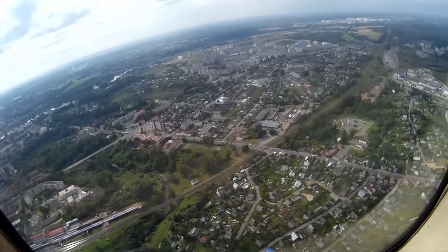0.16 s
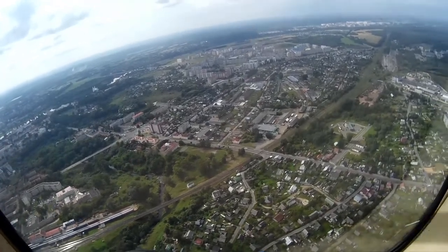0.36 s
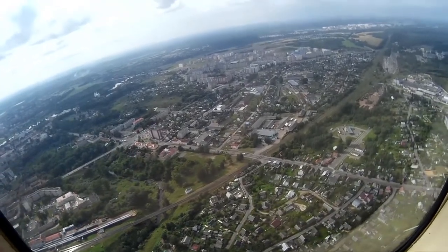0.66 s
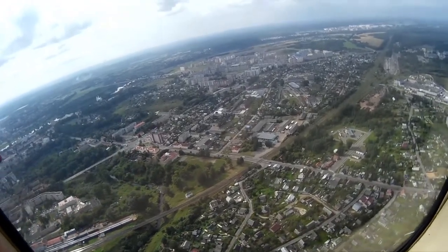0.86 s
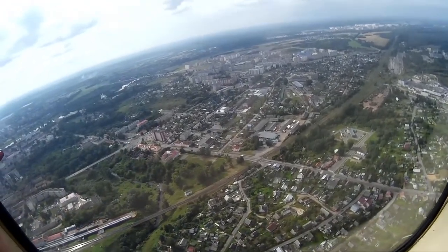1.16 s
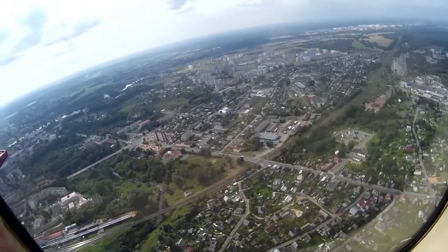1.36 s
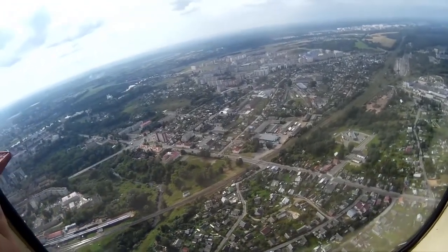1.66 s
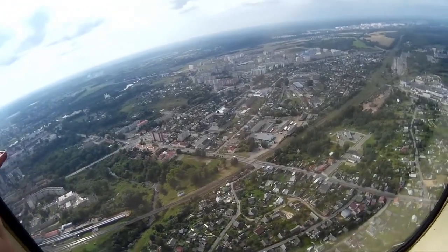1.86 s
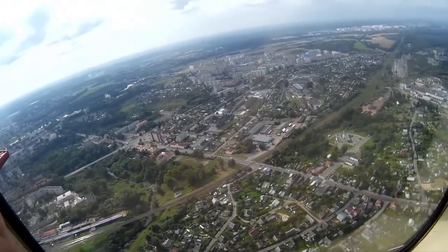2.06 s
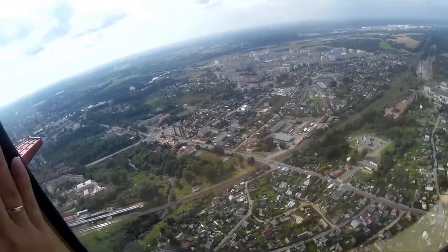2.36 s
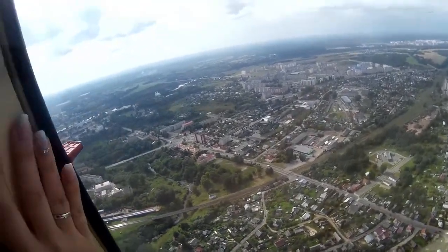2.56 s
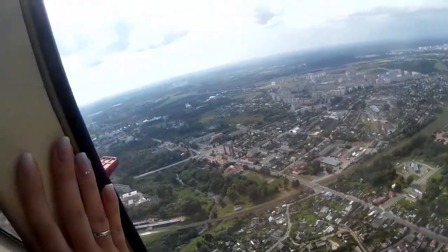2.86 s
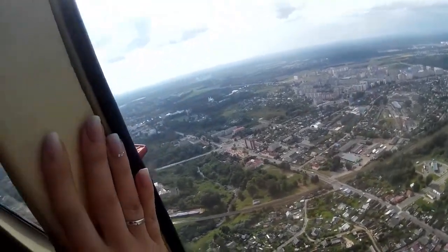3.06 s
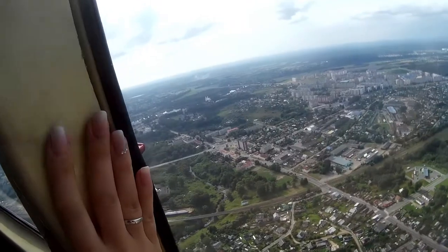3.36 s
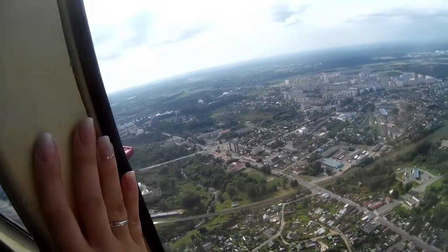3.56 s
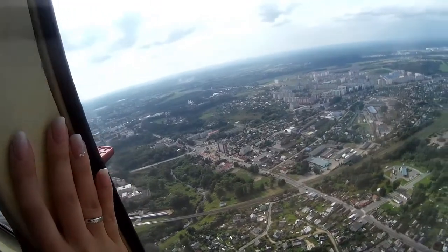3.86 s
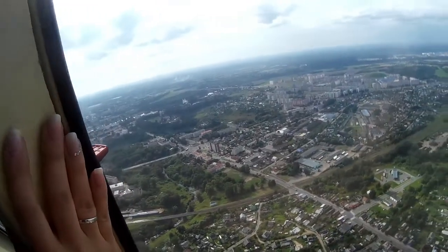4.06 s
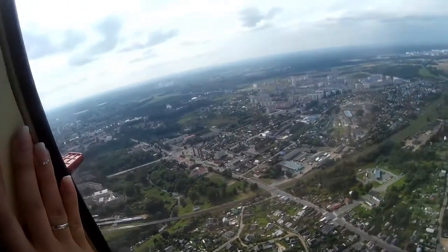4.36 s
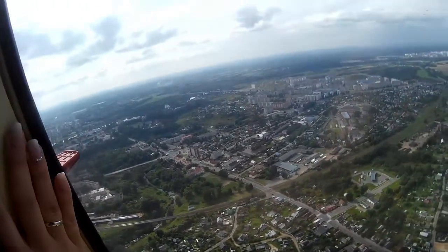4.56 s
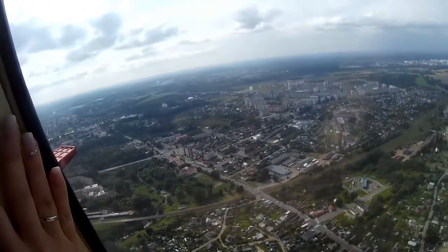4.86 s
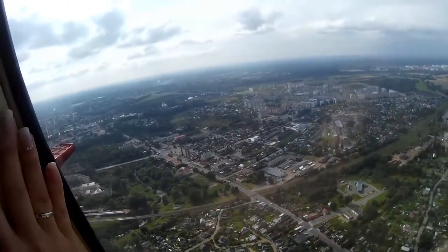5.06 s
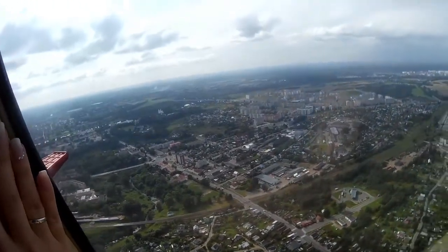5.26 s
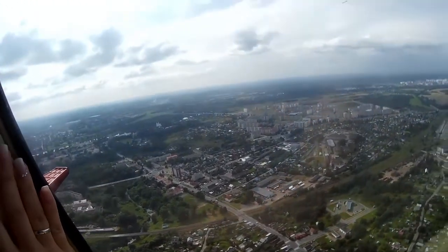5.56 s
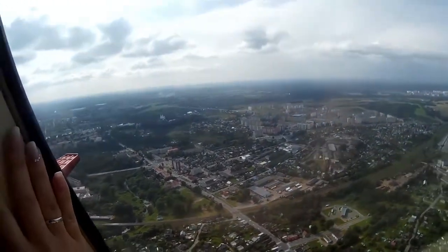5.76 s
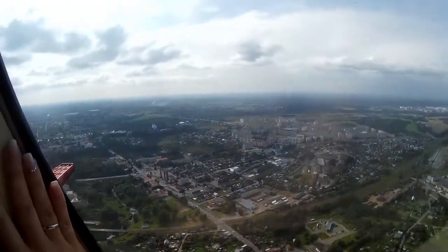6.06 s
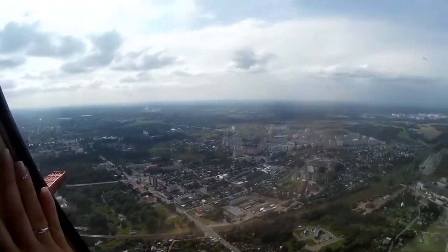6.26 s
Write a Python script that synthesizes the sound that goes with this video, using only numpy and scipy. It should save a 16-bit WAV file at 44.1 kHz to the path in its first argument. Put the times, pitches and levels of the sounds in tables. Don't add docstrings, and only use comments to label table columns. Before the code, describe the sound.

Inside a flying helicopter cabin, a loud steady engine drone and deep airflow roar carry a piercing, throbbing gear whine around two kilohertz.

```python
import sys
import numpy as np
from scipy import signal
from scipy.fft import rfft, irfft
from scipy.io import wavfile
from scipy.ndimage import uniform_filter1d

SR = 44100
rng = np.random.default_rng(int(sys.argv[2]) if len(sys.argv) > 2 else 0)


def inscribe(sig):
    pcm = np.round(np.clip(np.atleast_2d(sig).T, -1, 1) * 32767)
    wavfile.write(sys.argv[1], SR, pcm.astype(np.int16))


def attenuation_scalar(level_db):
    decades = np.asarray(level_db, float) / 20
    return 10 ** decades


N = 282240
CONTROL_STEP = 16
SLOW = np.arange(0, N, CONTROL_STEP) / SR

# time in seconds, speed in Hz.
SHAFT_SPEED = [(0, 98.70), (.3, 98.73), (1.05, 99.06), (1.5, 99.03), (1.85, 98.91), (2.2, 98.99),
               (2.8, 98.80), (3.2, 99.0), (3.65, 98.64), (4.0, 98.61), (4.2, 98.71), (4.45, 98.65),
               (5.3, 99.37), (5.5, 99.34), (5.95, 99.12), (6.4, 99.23)]
# time in seconds, level in dB.
WHINE_LEVEL = [(0, -16), (.36, -16), (.95, -19), (1.32, -14), (1.5, -17.5), (2.2, -18.5), (2.32, -15),
               (2.73, -10.5), (3.07, -14), (3.11, -23.5), (3.33, -23.5), (3.46, -17), (3.86, -16.5),
               (4.05, -18), (5.24, -16), (5.62, -18), (5.73, -15.2), (6.4, -19.5)]
# time in seconds, pitch in Hz, level in dB.
TURBINE_SPOOL = [(0, 685.5, -29), (1.3, 685.5, -31), (2.6, 684.5, -35), (3.6, 686, -33), (4.8, 689, -30),
                 (5.5, 688, -32), (6.4, 685, -32)]
FAN_HARMONICS_DB = [-15.3, -28, 0, -33.5, -39.5, -43, -36, -49, -45, -47]
WHINE_OVERTONES_DB = [-38.8, -53, -60, -59, -67]
SMALL_PART_ORDERS = [29.5, .49, .98, 2, 4.0645, 4.9647, 5.848, 7.104, 8.3587, 9.598, 9.9814, 10.8492, 11,
                     11.1426, 11.2824, 12.688, 13.895, 15, 15.6225, 16.49, 16.82, 16.99, 18.935, 19, 19.91,
                     20.08, 21, 22, 24, 25]
SMALL_PART_LEVELS_DB = [-48, -40, -35, -35, -34.5, -41, -38, -42, -36, -45, -40.5, -39.5, -45, -48, -38.5,
                        -44, -47, -47, -47, -41, -47, -47, -49, -47, -46, -46.5, -42, -39, -36.5, -38]
# frequency in Hz, density in dB per Hz.
ROAR_SPECTRUM = [(32, -6), (55, -11), (120, -5), (170, 0), (200, -3), (217, -10), (250, -3), (350, -13),
                 (600, -12), (1200, -19), (2600, -25), (4000, -35), (7000, -46), (15000, -56)]
# time in seconds, buffeting in dB about its mean.
WINDOW_BUFFET = [
    (0, -1),
    (1, -1),
    (2.3, 1.5),
    (4.5, 2),
    (6.4, 6),
]
GEARBOX_SHAKERS = [(.1103, .14, .2, .362), (.1253, .18, .02, -.066), (.1356, -.067, .32, .06),
                   (.132, .056, .17, -.028), (.1226, .022, .108, .042), (.1174, .016, .092, .49),
                   (.5196, 0, .127, -.05), (.5163, .03, .09, .18)]
# time in seconds, dB gained by the main mesh's second tone.
WALL_GAIN = [(0, 2.5), (.45, 1), (1.2, -4), (2.1, -0.5), (2.5, 0), (3.7, -1), (4.5, 6.5), (5.3, 8),
             (6.0, 0)]
MESH_TONES_DB = [-20.5, -29.5, -34.5]

BLADE, FAN, MAIN_MESH, PINION = .12518, 1.5446, 6.5096, 23
FAN_THIRD_DB = -21.5
WALL_SHARE_FAN, WALL_SHARE_MESH = 0.1, 0.17
MESH_THIRD_DB_PER_HZ = 16
OVERTONE_WANDER_DB = 1.6
SHAKE_AT_DB, SHAKE_STEADY = -17.5, .9
ROAR_DB, RUSH_DB = -16.5, -2.3
COMPRESSOR_HZ, COMPRESSOR_WIDTH_HZ, COMPRESSOR_DB = 11450, 620, -48.5
TOP_HZ = 15740


def held(control):
    return np.repeat(control, CONTROL_STEP)[:N]


def curve(table):
    s, *columns = np.transpose(table)
    return [np.interp(SLOW, s, column) for column in columns]


def walk(rate):
    steps = int(N * rate / SR) + 2
    stairs = np.repeat(rng.standard_normal(steps), 16)
    smooth = uniform_filter1d(uniform_filter1d(stairs, size=16), size=16)
    return 1.3 * np.interp(SLOW * rate * 16, np.arange(len(smooth)), smooth)


def tone(turns, db, waver_db=1.5, slip=.03, rate=3):
    gain = np.sqrt(2) * attenuation_scalar(db + waver_db * walk(rate))
    phase = rng.random() + slip * walk(rate)
    return held(gain) * np.sin(2 * np.pi * (turns + held(phase)))


def compressor():
    hz = np.arange(N // 2 + 1) * SR / N
    whistle = np.exp(-.5 * ((hz - COMPRESSOR_HZ) / COMPRESSOR_WIDTH_HZ) ** 2)
    rising = .45 * (hz / 15000) ** 3
    hiss = irfft(rfft(rng.standard_normal(N)) * (whistle + rising), N)
    return hiss / hiss.std() * held(attenuation_scalar(COMPRESSOR_DB + 1.2 * walk(4.2)))


def roar(turns):
    hz = np.maximum(np.arange(N // 2 + 1) * SR / N, 1)
    knots_hz, knots_db = np.transpose(ROAR_SPECTRUM)
    colour = attenuation_scalar(np.interp(np.log(hz), np.log(knots_hz), knots_db)) * (hz > 21)
    noise = rfft(rng.standard_normal(N)) * colour
    buffet_db = curve(WINDOW_BUFFET)[0]
    place = 2 * np.log2(hz / 16)
    swell = walk(.8)
    out = np.zeros(N)
    for step in range(21):
        band = irfft(noise * np.maximum(1 - abs(place - step), 0), N)
        flow_db = (step < 5) * buffet_db + (step > 14) * RUSH_DB - (step > 17) * 1.5
        out += held(attenuation_scalar(0.18 * swell + 0.67 * walk(4.79) + flow_db)) * band
    out *= 1 + 0.0057 * np.cos(2 * np.pi * BLADE * turns)
    return out * attenuation_scalar(ROAR_DB) / out.std()


def small_parts(turns):
    out = np.zeros(N)
    for order, line_db in zip(SMALL_PART_ORDERS, SMALL_PART_LEVELS_DB):
        out += tone(order * turns, line_db)
    spool_hz, spool_db = curve(TURBINE_SPOOL)
    return out + tone(np.cumsum(held(spool_hz)) / SR, spool_db)


def rotor_and_fan(turns):
    fan_third_db = FAN_THIRD_DB + WALL_SHARE_FAN * curve(WALL_GAIN)[0]
    out = np.sqrt(2) * attenuation_scalar(-20.0) * np.cos(2 * np.pi * (BLADE * turns - .47))
    out += tone(turns, -14.5, waver_db=.5, slip=.015)
    for k, db in enumerate(FAN_HARMONICS_DB, start=1):
        out += tone(k * FAN * turns, db + (k == 3) * fan_third_db, waver_db=.6, slip=0.011)
    return out


def main_mesh(turns):
    load = 1 + .2 * np.cos(2 * np.pi * BLADE * turns)
    wall_db, speed = curve(WALL_GAIN)[0], curve(SHAFT_SPEED)[0]
    panel_db = MESH_THIRD_DB_PER_HZ * (speed - speed.mean())
    moves_db = [WALL_SHARE_MESH * wall_db, wall_db, panel_db]
    out = np.zeros(N)
    for k, (db, move_db) in enumerate(zip(MESH_TONES_DB, moves_db), start=1):
        out += tone(k * MAIN_MESH * turns, db + move_db, waver_db=1.08, slip=0.015)
    fading_db = np.interp(SLOW, [.4, .7, 2.1, 2.5], [-57, -46, -46, -59])
    for k, db in [(4, -47), (6, fading_db), (7, -51)]:
        out += tone(k * MAIN_MESH * turns, db)
    return load * out


def whine(turns):
    db = curve(WHINE_LEVEL)[0]
    along = np.arange(N) / N
    shake = np.zeros(N)
    for order, first, last, lead in GEARBOX_SHAKERS:
        depth = first + (last - first) * along
        shake += depth * np.cos(2 * np.pi * (order * turns + lead))
    deepen = held(attenuation_scalar(SHAKE_STEADY * np.maximum(SHAKE_AT_DB - db, 0)))
    throb = np.clip(shake * deepen, -.75, .75)
    blade_sway = 0.053 * np.cos(2 * np.pi * BLADE * turns)
    teeth = PINION * turns - blade_sway + held(0.052 * walk(6))
    source_db = db + .15 * np.maximum(db + 15, 0)
    out = (1 + 1.04 * throb) * tone(teeth, source_db, waver_db=0.76, slip=.008, rate=150)
    for k, over_db in enumerate(WHINE_OVERTONES_DB, start=2):
        wander_db = over_db - 2 + OVERTONE_WANDER_DB * walk(2.5)
        rough = tone(k * teeth, wander_db, waver_db=2.5, slip=.025 * k, rate=50)
        out += (1 - 0.83 * throb) * rough
    return out


def scene():
    turns = np.cumsum(held(curve(SHAFT_SPEED)[0])) / SR
    air = compressor() + roar(turns)
    geared = small_parts(turns) + rotor_and_fan(turns) + main_mesh(turns) + whine(turns)
    return (air + geared)[None]


def low_pass(x):
    return signal.sosfilt(signal.butter(12, 15890, fs=SR, output="sos"), x)


def record(dry):
    top, lift = .71, .09
    clipped = np.clip(attenuation_scalar(0.61) * dry[0], -top, top)
    bright = np.convolve(clipped, [-lift, 1 + 2 * lift, -lift], "same")
    lowpass = signal.ellip(12, .2, 30, TOP_HZ, fs=SR, output="sos")
    mix = signal.sosfilt(lowpass, bright)
    return low_pass(mix[None])


dry = scene()
out = record(dry)
inscribe(out)
```